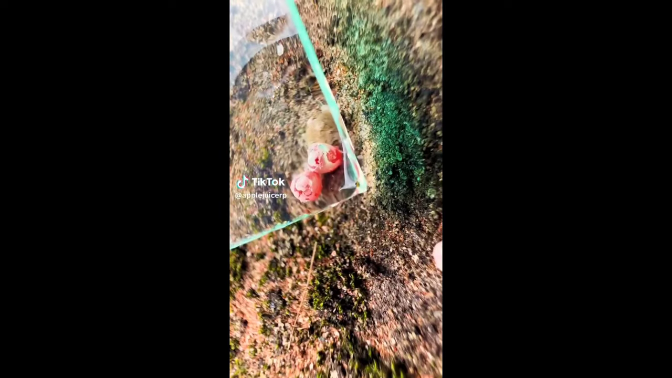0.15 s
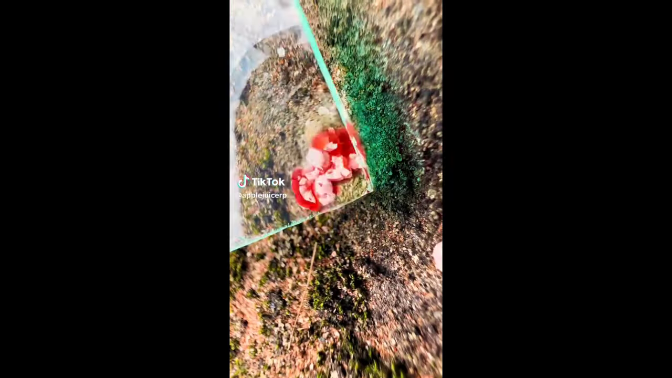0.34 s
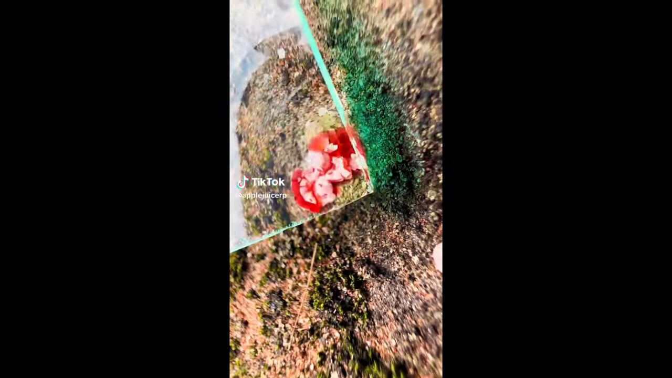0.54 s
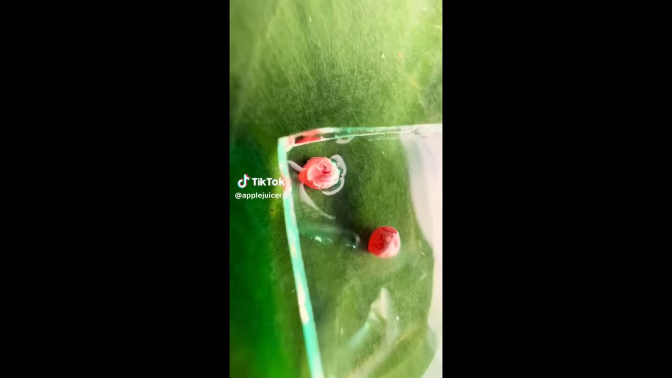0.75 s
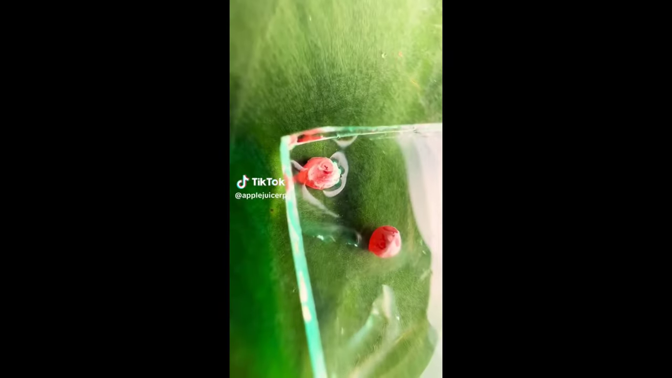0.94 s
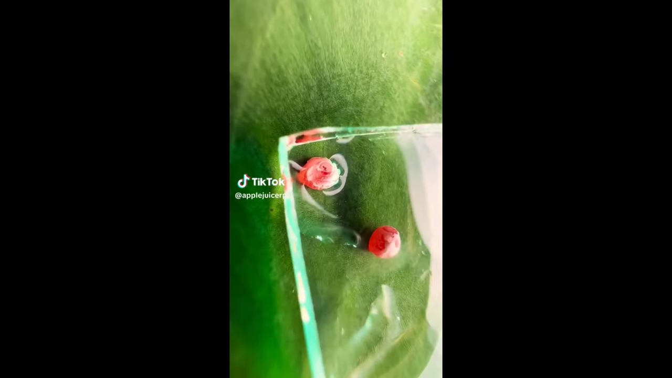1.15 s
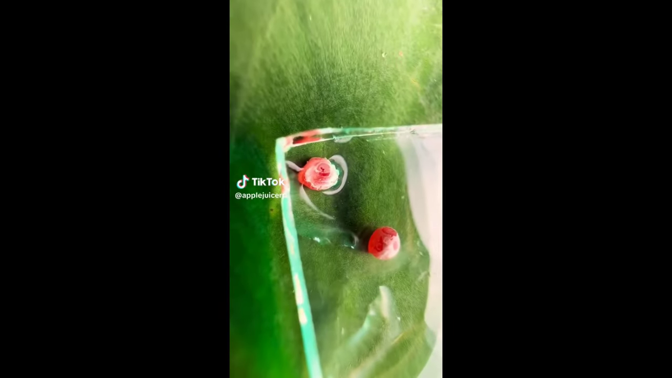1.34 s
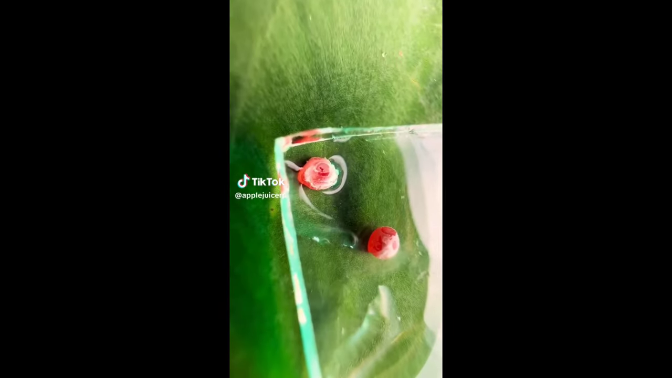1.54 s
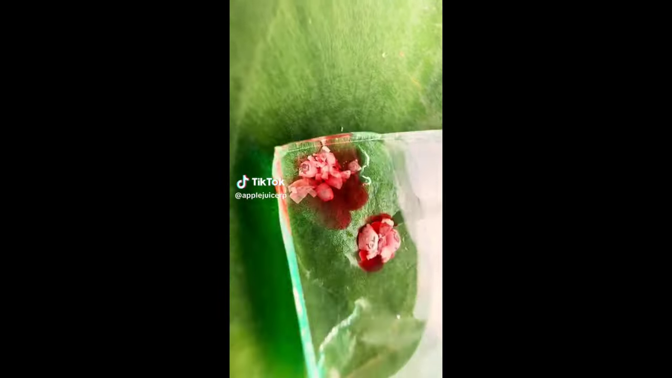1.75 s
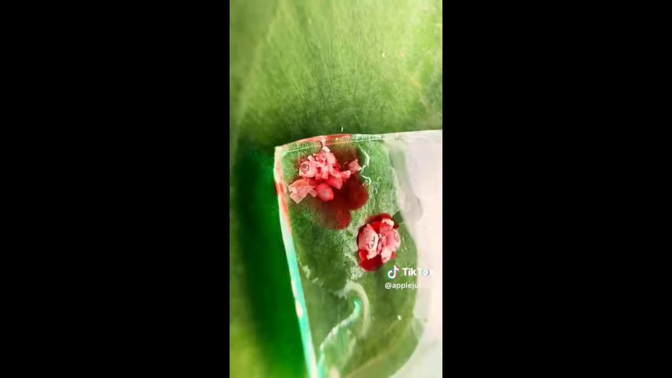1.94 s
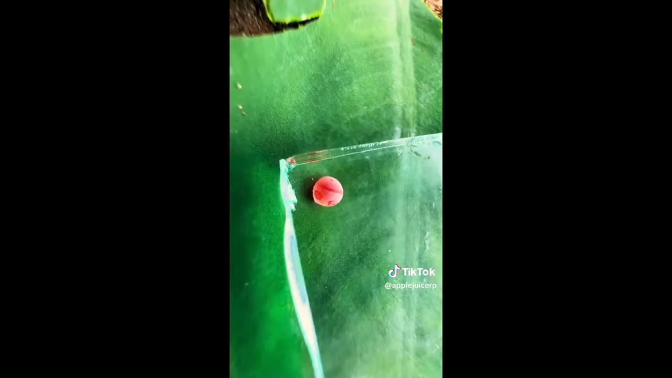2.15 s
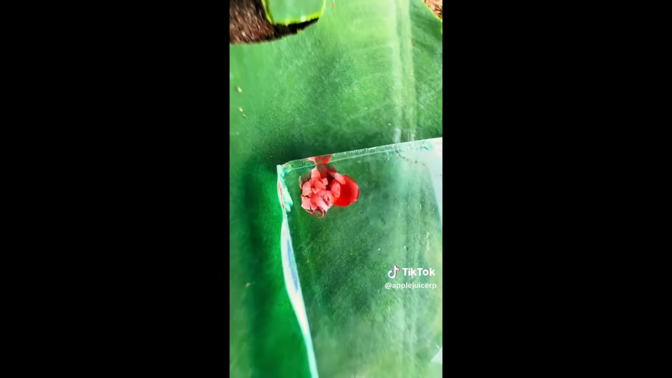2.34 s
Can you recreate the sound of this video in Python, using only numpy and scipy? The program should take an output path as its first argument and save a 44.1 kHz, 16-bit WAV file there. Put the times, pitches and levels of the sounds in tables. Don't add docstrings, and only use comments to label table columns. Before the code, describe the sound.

Brittle little eggs crushed under a glass plate in three short, crisp crackling bursts outdoors

```python
import sys
import numpy as np
from scipy import signal
from scipy.fft import rfft, irfft
from scipy.io import wavfile
from scipy.ndimage import uniform_filter1d, map_coordinates

SR = 44100
rng = np.random.default_rng(int(sys.argv[2]) if len(sys.argv) > 2 else 0)


def invert_db(x):
    u = np.asarray(x, float) / 20
    return 10 ** u


def wav_record(signal):
    frames = np.transpose(np.atleast_2d(signal))
    bounded = np.clip(frames, -1, 1)
    quanta = np.round(bounded * 32767).astype(np.int16)
    wavfile.write(sys.argv[1], SR, quanta)


N = 110250

# (start [s], end [s], level [dB])
SHOTS = [
    (-.1, .4705, -52.5),
    (.486, 1.88, -56.5),
    (1.891, 2.6, -53.5),
]
# (frequency [Hz], density [dB per Hz])
RUMBLE = [
    [(15, -44.5), (25, -14), (249, 1), (399, -20), (500, -12), (1200, -22.5), (1560, -49.5), (2640, -120)],
    [(82, -14), (140, -3.5), (335, -10), (732, -34), (1200, -29), (1560, -62), (2640, -120)],
    [(15, -54), (25, -20.5), (186, -2.5), (386, -7.5), (454, -19.5), (1200, -25), (1560, -43.5),
     (2640, -120)],
]
# (frequency [Hz], density [dB per Hz])
CHORUS = [
    [(590, -54), (1000, -21), (2370, -13.5), (3760, -19), (5030, -14), (6600, -16.5), (8570, -0.5),
     (10100, -8), (13100, -38), (22000, -120)],
    [(590, -19.5), (1000, -15.5), (1270, -8), (4700, -12), (5650, -3.5), (6530, -5), (9080, -0.5),
     (10100, -4), (13100, -33), (22000, -120)],
    [(590, -60), (1000, -21), (1960, -14), (2490, -13), (4070, -18), (8390, -2.5), (10200, -8.5),
     (11000, -19.5), (14300, -42), (22000, -120)],
]
CHORUS_TOP_HZ = [10400, 10105, 11250]
RUMBLE_DB = [-16.5, -5.5, -10.5]
RUMBLE_GROWS_DB = [10, -2.5, -1.5]
# (frequency [Hz], density [dB per Hz])
AIR = [(12800, -120), (13400, -1.5), (15400, -3.5), (15900, -120)]
AIR_DB = [-58.5, -35, -41]
# (frequency [Hz], side over mid [dB])
WIDTH = [(60, -20.5), (180, -14), (550, 2.5), (1650, -4.5), (4970, -3.5), (15000, -2)]
# (time [s], low tone level [dB], high tone level [dB])
HUM = [(.5, -69, -64.5), (0.721, -60.5, -66), (1.301, -59, -63.5), (1.6, -62.5, -61), (1.88, -60, -71)]
# (time [s], level [dB], frequency [Hz], t60 [s])
KNOCKS = [
    (0.331, -49, 75, 0.12),
    (0.639, -49.5, 398, 0.071),
    (0.691, -47, 243, 0.085),
    (.84, -48, 245, 0.077),
    (.875, -45.5, 218.6, 0.096),
]
# (time [s], peak [dB], first pitch [Hz], last pitch [Hz], t60 [s])
THUDS = [(0.2449, -23, 238, 90, 0.023), (0.2617, -29, 190, 118, 0.028), (0.2709, -33.5, 140.4, 200, 0.05),
         (.248, -36.5, 75, 60, .065), (1.6002, -27.5, 463, 340, 0.017), (1.601, -18.5, 588, 90, 0.068),
         (1.639, -35.5, 95, 80, 0.036), (2.1240, -15.5, 187, 73.5, 0.046), (2.1350, -30, 100, 85, .035),
         (1.6170, -32, 110, 95, .035)]
SAG_S = [.004, 0.0062, 0.01, .01, 0.0028, .0038, .006, 0.004, .004, .004]
RISE_S = [0.001, 0.00082, 0.0013, 0.0055, 0.00047, 0.0061, .003, 0.0013, .0015, .0015]
THUD_PAN_DB = [0.5, -1.2, -2, -0.4, -10.5, -2.5, -7.5, -2.3, -2.3, -2.3]
# (time [s], pitch [Hz], level [dB])
SQUEAK = [(1.562, 7200, -52), (1.576, 7400, -41), (1.578, 5700, -38), (1.585, 6300, -35),
          (1.592, 7000, -25), (1.5965, 6900, -26), (1.600, 6000, -50)]
# (time [s], crackle level [dB], brightness [dB])
CRUSH = [
    [(.2170, -62, 0), (.2210, -38, 0), (.2280, -42, -2), (.2295, -33, 0), (.2400, -39, -2), (.2425, -24, 0),
     (.2515, -31, -1), (.2545, -38, -17), (.292, -56, -24)],
    [(1.56, -71, -6), (1.5775, -43, -14), (1.5852, -37, -4), (1.5865, -18, -1), (1.595, -21, -1),
     (1.5975, -15, -1), (1.603, -26.5, -2), (1.615, -48, -3), (1.65, -62, -3)],
    [(2.097, -66, -8), (2.1005, -40, -16), (2.1062, -37, -4), (2.1078, -19, 0), (2.112, -25.5, 0),
     (2.1225, -25, 0), (2.1240, -41, -2), (2.147, -50, -3), (2.19, -68, -3)],
]
# (frequency [Hz], density [dB per Hz])
SHELL = [
    [(220, -39.5), (1100, -16.5), (2160, -8), (3700, -24.5), (5900, -17.5), (9500, -17.5), (15700, -25.5),
     (16100, -45)],
    [(300, -34.5), (2090, -10), (3300, -10), (7000, -5.5), (11000, -10), (15700, -12.5), (16100, -32)],
    [(650, -16), (1400, -27), (2800, -14), (3680, -16), (9180, -8), (15700, -18), (16100, -36)],
]
SHELL_DB = [4.5, -3, -2]
PAN_DB = [-0.5, 0.8, 1]
SPREAD_DB = [-8, -12.5, -7.5]
BRIGHT_HZ = [5500, 9000, 9500]
# (time [s], peak [dB], frequency [Hz], length [cycles])
SNAPS = [
    [(.2222, -26, 2000, 1.5), (.2295, -24, 2100, 2), (.2312, -22, 2000, 1.5), (.2342, -25, 2300, 1.5),
     (.2414, -16, 1150, 1.8), (.24195, -4, 2200, 1.7), (.2420, -16, 4750, 4), (.2424, -19, 7800, 2),
     (.2470, -19, 4696, 4), (.2472, -22, 10300, 5), (.2518, -19, 1800, 1), (.2566, -20, 1150, 1.5),
     (.2583, -19.5, 2150, 3), (.2681, -15.5, 1320, 0.85), (.2708, -23, 1500, 1), (.2795, -29, 1000, 1.2)],
    [(1.5864, -13, 6170, 4), (1.5868, -16, 13000, 2), (1.5900, -19, 6900, 3), (1.5920, -20, 7000, 3),
     (1.5973, -9.5, 4800, 1.26), (1.5976, -11, 12340, 3), (1.5982, -14, 6000, 2), (1.5980, -21, 15330, 30)],
    [(2.1071, -13.5, 9290, 9.8), (2.1078, -19, 6170, 5), (2.1095, -24, 2850, 6), (2.1100, -21, 8800, 4),
     (2.1130, -16, 8995, 3), (2.1170, -17, 9800, 2), (2.1198, -18, 9640, 6)],
]
SNAP_PAN_DB = [2.2, -2.5, 2]
# (frequency [Hz], level [dB], t60 [s], muted by contact at [s])
PLATE = [
    [(673, -15, .1, .283), (1476, -5, 0.125, .345), (2116, -2.5, .09, .264), (4646, -10, .12, .274),
     (7615, -13, 0.07, .264), (2950, -14, .07, .28), (10510, -16, .03, .26)],
    [(563, -13, 0.024, 1.63), (2100, -2, 0.07, 1.614), (6265, -12, .02, 1.61), (7615, -11, 0.07, 1.623),
     (15330, -14, .1, 1.65), (4667, -13, .04, 1.62)],
    [(2099, -6, 0.09, 2.136), (2815, -6, 0.09, 2.146), (6170, -5, .015, 2.13), (9800, -12, 0.04, 2.15),
     (4620, -10, 0.07, 2.146)],
]
PLATE_DB = [-11, -10, -6]
# (time [s], level [dB])
STRIKES = [
    [(.2205, -33), (.2290, -29), (.2420, -19), (.2683, -30)],
    [(1.5785, -40), (1.5865, -24), (1.5975, -26)],
    [(2.1000, -42), (2.1085, -22)],
]


def unit(x):
    return x / np.sqrt(np.mean(x ** 2) + 1e-20)


def along(points, hz):
    f, v = np.transpose(points)
    return np.interp(np.log(hz + 1), np.log(f + 1), v)


def wobble(rate):
    knots = rng.standard_normal(int(N * rate / SR) + 4)
    return map_coordinates(knots, [np.arange(N) * rate / SR])


def coloured(x, spectrum):
    size = 4096
    db = np.maximum(along(spectrum, np.fft.rfftfreq(size, 1 / SR)), -70)
    cepstrum = irfft(np.log(invert_db(db)), size)
    cepstrum[1:size // 2] *= 2
    cepstrum[size // 2 + 1:] = 0
    response = irfft(np.exp(rfft(cepstrum)), size)
    return signal.fftconvolve(x, response[None], axes=1)[:, :x.shape[1]]


def rush(spectrum, patchy_db, top_hz=16000):
    hz, _, z = signal.stft(rng.standard_normal((2, N)), SR, nperseg=2048)
    patches = uniform_filter1d(rng.standard_normal(z.shape[1:]), 15, 0)
    patches = unit(uniform_filter1d(patches, 3, 1))
    colour = invert_db(along(spectrum, hz)) * np.clip((top_hz - hz) / 100, 0, 1)
    gain = colour * [np.ones(len(hz)), invert_db(along(WIDTH, hz))]
    z = z * gain[:, :, None] * invert_db(patchy_db * patches)
    mid, side = signal.istft(z, nperseg=2048)[1][:, :N]
    return np.array([mid + side, mid - side]) / np.sqrt(np.mean(mid ** 2))


def add(track, s, sound):
    first = round(s * SR)
    track[..., first:first + sound.shape[-1]] += sound


def pan(db):
    return invert_db(np.array([[db / 2], [-db / 2]]))


def outdoors():
    fade_in_s, fade_out_s, gap_db = 0.01, 0.0016, -17.5
    t, out = np.arange(N) / SR, 0
    for k, (start, end, db) in enumerate(SHOTS):
        gate = np.clip(np.minimum((t - start) / fade_in_s, (end - t) / fade_out_s), 0, 1)
        near = (t > start - .03) & (t < end + .03)
        gate = np.maximum(gate, invert_db(gap_db) * near)
        chorus = invert_db(0.67 * wobble(8.9) + 0.74 * wobble(560)) * rush(CHORUS[k], 0.98, CHORUS_TOP_HZ[k])
        swell_db = RUMBLE_GROWS_DB[k] * (t - (start + end) / 2)
        rumble = invert_db(RUMBLE_DB[k] + swell_db + 0.79 * wobble(8.07)) * rush(RUMBLE[k], 2)
        air = invert_db(AIR_DB[k] + 3.5 * wobble(5)) * rush(AIR, 5)
        out = out + invert_db(db) * gate * (chorus + rumble + air)
    return out


def rustle():
    start_s, length_s, level_db = 0.56, 0.17, -69
    u = np.clip((np.arange(N) / SR - start_s) / length_s, 0, 1)
    return invert_db(level_db) * np.sin(np.pi * np.sqrt(u)) * rush([(300, 3), (15000, -7)], 5)


def whine():
    hz, level_db = 10484, -70
    level = invert_db(level_db + 1.5 * wobble(10.6))
    return level * np.sin(2 * np.pi * hz * np.arange(N) / SR + 0.45 * wobble(16))


def hum():
    t, out = np.arange(N) / SR, np.zeros(N)
    s, *levels = np.transpose(HUM)
    start, end, _ = SHOTS[1]
    gate = np.clip(np.minimum(t - start, end - t) / 0.01, 0, 1)
    for hz, db in zip((74.5, 123), levels):
        level = invert_db(np.interp(t, s, db) + 5 + 1.46 * wobble(8.83))
        out += gate * level * np.sin(2 * np.pi * hz * t + 0.58 * wobble(5.93))
    return out


def knocks():
    out, t = np.zeros(N), np.arange(SR // 8) / SR
    for s, db, hz, t60 in KNOCKS:
        swell = invert_db(db - 60 * t / t60) * (1 - np.exp(-t / 0.0035))
        add(out, s, swell * np.sin(2 * np.pi * hz * t))
    return out


def thuds():
    blunt = 1.7
    out, t = np.zeros((2, N)), np.arange(SR // 6) / SR
    for (s, db, first_hz, last_hz, t60), sag, rise, pan_db in zip(THUDS, SAG_S, RISE_S, THUD_PAN_DB):
        turns = last_hz * t + (first_hz - last_hz) * sag * (1 - np.exp(-t / sag))
        swell = invert_db(db - 60 * (t / t60) ** blunt) * (1 - np.exp(-t / rise)) ** 2
        add(out, s, pan(pan_db) * swell * np.sin(2 * np.pi * turns))
    return out


def squeak():
    s, hz, db = np.transpose(SQUEAK)
    t = np.arange(N) / SR
    turns = np.cumsum(np.interp(t, s, hz) + 260 * wobble(1200)) / SR
    level_db = np.interp(t, s, db, left=-150, right=-150)
    return invert_db(level_db + 3.5 * wobble(800)) * np.sin(2 * np.pi * turns)


def cracking_force(k, t):
    scatter_db, clump_db = 2.5, 3
    s, db, _ = np.transpose(CRUSH[k])
    cracks = rng.standard_normal((2, len(t)))
    cracks *= invert_db(scatter_db * rng.exponential(size=len(t)) + clump_db * wobble(900)[:len(t)])
    evened = cracks / np.sqrt(uniform_filter1d(cracks[0] ** 2, size=150) + 1e-9)
    return evened * invert_db(np.interp(t + s[0], s, db, right=-150) + SHELL_DB[k])


def shells(k, t, force):
    s, _, bright_db = np.transpose(CRUSH[k])
    shell = coloured(force, SHELL[k]) / np.linalg.norm(coloured(np.eye(1, 4096), SHELL[k]))
    low, high = [signal.sosfiltfilt(signal.butter(2, BRIGHT_HZ[k], kind, fs=SR, output='sos'), shell)
                 for kind in ('low', 'high')]
    return low + invert_db(np.interp(t + s[0], s, bright_db)) * high


def snaps(k, t):
    out, t = np.zeros(len(t)), t[:300]
    for at, peak_db, hz, cycles in SNAPS[k]:
        u = t * hz / cycles
        burst = np.e * 2 * u * np.exp(-2 * u)
        add(out, at - CRUSH[k][0][0], invert_db(peak_db) * burst * np.sin(2 * np.pi * hz * t))
    return out


def plate(k, t, force):
    damped, mute_s = 0.49, .005
    start = CRUSH[k][0][0]
    ring, driven = np.zeros(len(t)), np.zeros((2, len(t)))
    for hz, level, t60, muted in PLATE[k]:
        swing = np.sin(2 * np.pi * hz * t)
        mute = np.exp(-np.maximum(t + start - muted, 0) / mute_s)
        free = invert_db(level - 60 * t / t60)
        struck = np.zeros(len(t))
        for at, strike_db in STRIKES[k]:
            add(struck, at - start, invert_db(strike_db) * free[:SR // 4])
        ring += mute * struck * swing
        touched = invert_db(level - 60 * t / t60 / damped) * swing
        shaken = signal.fftconvolve(force, touched[None], axes=1)[:, :len(t)]
        driven += mute * invert_db(PLATE_DB[k] - 21.5) * shaken
    return ring, driven


def crush(k):
    t = np.arange(SR // 3) / SR
    force = cracking_force(k, t)
    ring, driven = plate(k, t, force)
    mid, side = shells(k, t, force) + driven
    wide = invert_db(SPREAD_DB[k]) * side
    crackle = pan(PAN_DB[k]) * (mid + np.array([wide, -wide]))
    sharp = pan(SNAP_PAN_DB[k]) * (snaps(k, t) + ring)
    out = np.zeros((2, N + SR))
    add(out, CRUSH[k][0][0], crackle + sharp)
    return out[:, :N]


def scene():
    background = outdoors() + rustle() + whine() + hum() + knocks()
    return background + crush(0) + crush(1) + crush(2) + squeak() + thuds()


def top_cut(x):
    return signal.sosfilt(signal.butter(12, 16810, fs=SR, output="sos"), x)


def record(dry):
    mix = signal.sosfilt(signal.ellip(8, .1, 60, 16250, fs=SR, output='sos'), dry)
    return top_cut(mix)


dry = scene()
out = record(dry)
wav_record(out)
```